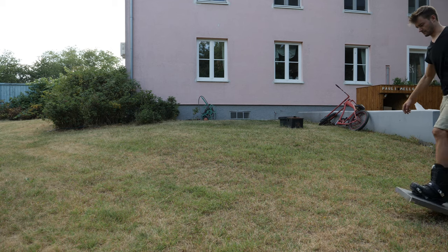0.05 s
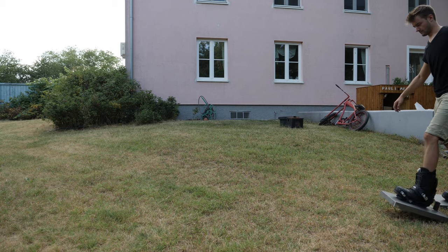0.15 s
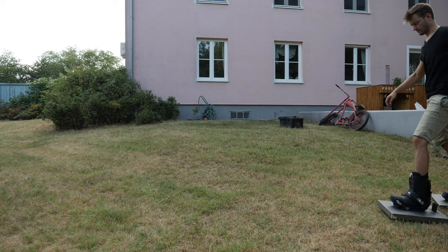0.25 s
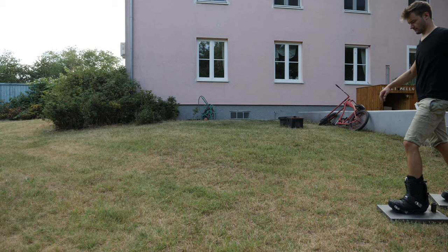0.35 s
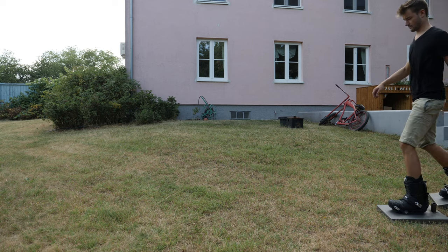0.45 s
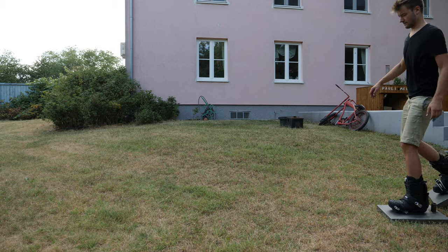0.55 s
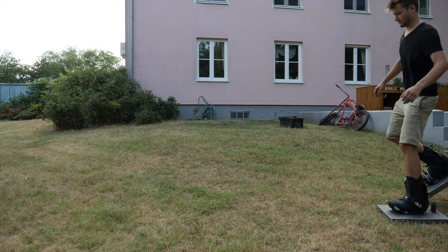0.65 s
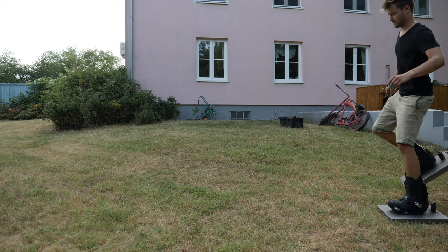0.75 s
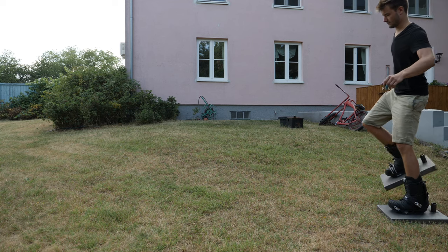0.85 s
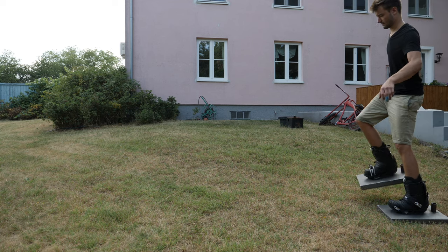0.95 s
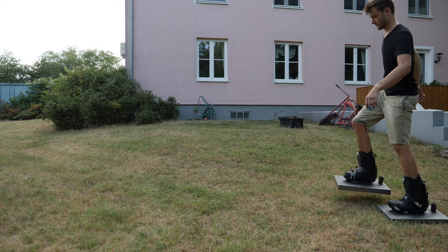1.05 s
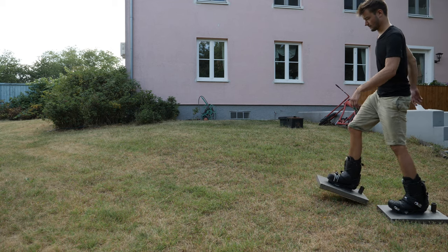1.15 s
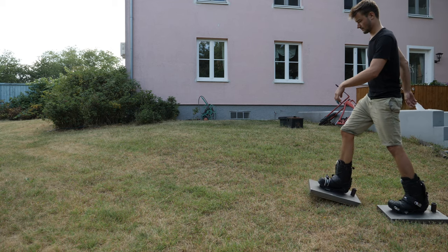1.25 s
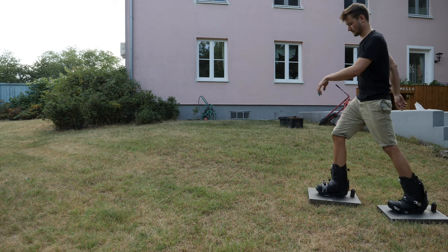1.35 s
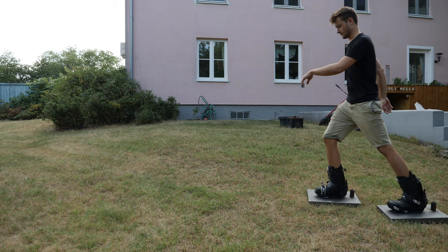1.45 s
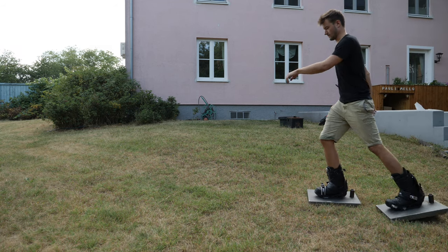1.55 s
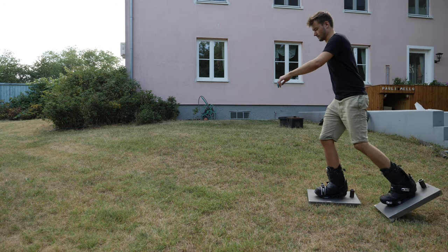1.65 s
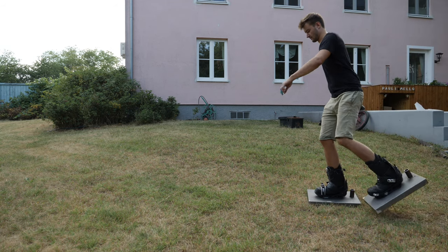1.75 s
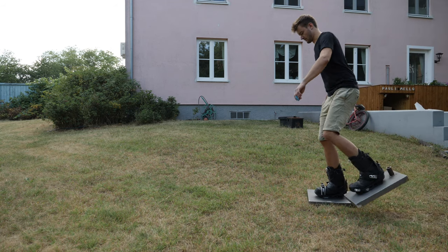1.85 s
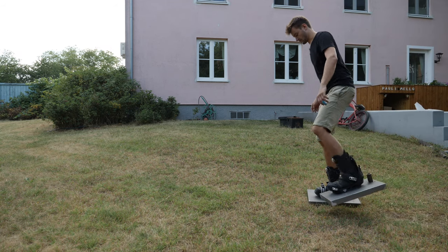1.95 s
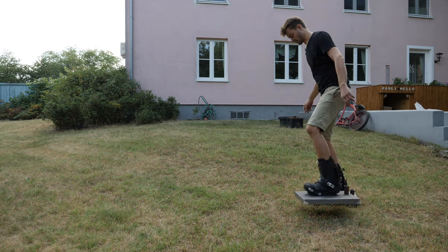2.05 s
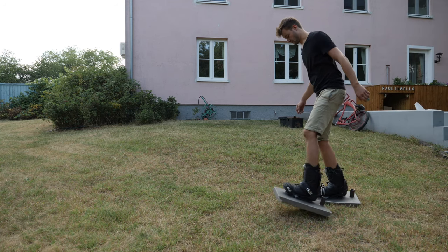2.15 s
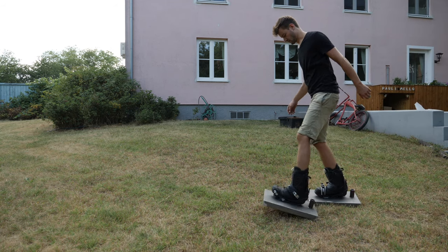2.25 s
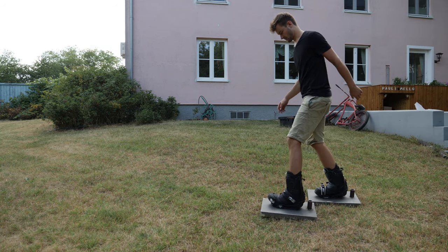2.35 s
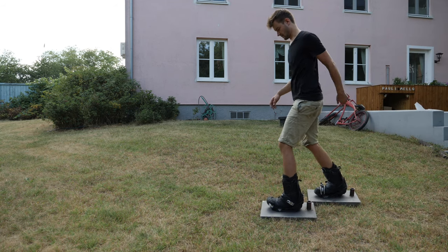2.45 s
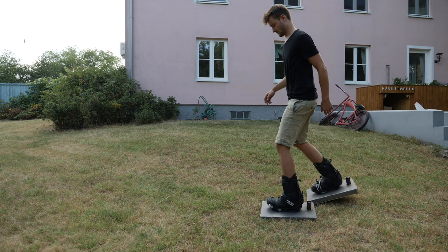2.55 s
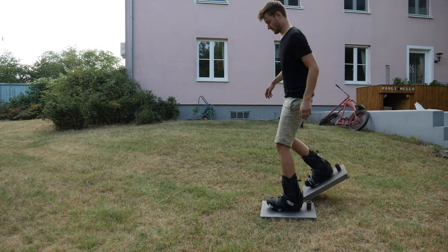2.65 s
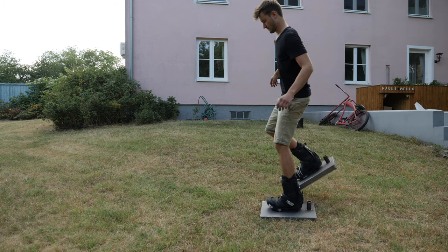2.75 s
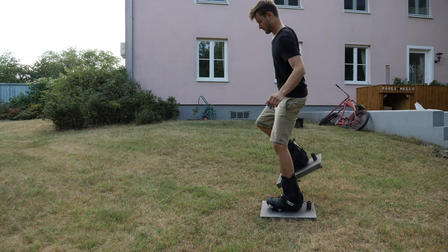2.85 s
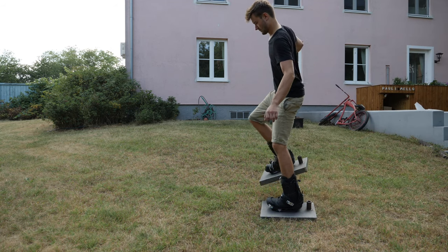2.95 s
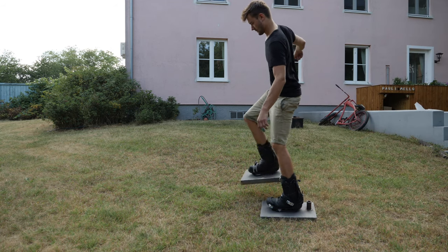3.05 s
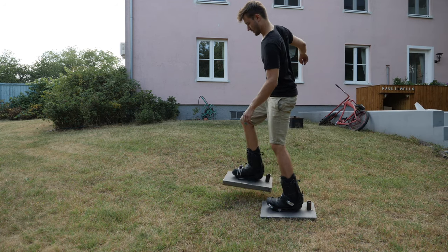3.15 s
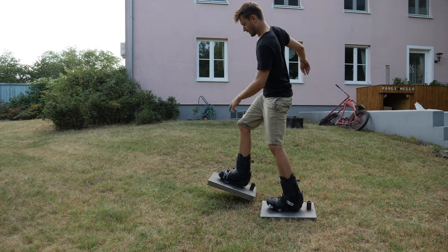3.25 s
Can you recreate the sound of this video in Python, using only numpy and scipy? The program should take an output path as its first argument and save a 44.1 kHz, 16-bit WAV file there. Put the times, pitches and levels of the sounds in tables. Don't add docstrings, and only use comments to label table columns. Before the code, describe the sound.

Plated boots walk on a dry lawn: hollow knocks, grass crackle, shell creaks, buckle ticks, wind rumble.

```python
import sys
import numpy as np
from scipy import signal
from scipy.fft import rfft, irfft
from scipy.io import wavfile
from scipy.ndimage import uniform_filter1d

SR = 44100
rng = np.random.default_rng(int(sys.argv[2]) if len(sys.argv) > 2 else 0)


def makeup_ratio(level_db):
    decades = np.asarray(level_db, float) / 20
    return 10 ** decades


def master(y):
    cut = np.clip(np.atleast_2d(y).T, -1, 1)
    pcm = np.round(cut * 32767)
    wavfile.write(sys.argv[1], SR, pcm.astype(np.int16))


N = 145530

# [t/s, level/dB]
GUSTS = [(0, -40.5), (.25, -38.5), (.5, -38.5), (.84, -30.5), (1.1, -35), (1.36, -38), (1.44, -26),
         (1.52, -36), (1.6, -20), (1.69, -21.5), (1.79, -38.5), (1.89, -26), (1.96, -33), (2.15, -20),
         (2.3, -31.5), (2.8, -29.5), (3.0, -22), (3.1, -40)]
# [f/Hz, level/dB per Hz]
AIR_COLOUR = [(90, -11.5), (210, -4.5), (300, -9.5), (3400, -28), (9000, -30), (11500, -21.5),
              (16000, -27.5)]
# [peak t/s, rise t/s, fall t/s, blades level/dB, scuff level/dB]
GRASS_CRUSHES = [(.0, .01, 0.02, -85, -64), (0.219, 0.057, 0.088, -36.5, -47),
                 (0.377, 0.14, 0.042, -45, -50), (0.413, 0.032, 0.023, -37.5, -44),
                 (0.487, 0.42, 0.12, -50, -46.5), (.63, 0.1, 0.1, -56, -47.5),
                 (0.757, 0.22, 0.15, -58, -51.5), (.97, 0.03, 0.17, -63, -53.5),
                 (1.297, 0.1, 0.14, -45, -44), (1.42, 0.14, 0.15, -57.5, -55),
                 (1.47, 0.017, 0.038, -42, -53), (1.494, 0.038, 0.022, -39, -42.5),
                 (1.547, 0.28, 0.14, -50.5, -47.5), (1.767, 0.19, 0.08, -49, -47),
                 (2.235, .01, 0.057, -70, -61.5), (2.179, 0.011, 0.068, -76, -56),
                 (2.302, 0.053, 0.11, -37.5, -54.5), (2.449, 0.024, 0.012, -44.5, -47.5),
                 (2.507, 0.17, 0.034, -40.5, -43.5), (2.559, 0.073, 0.079, -43, -45.5),
                 (2.739, 0.53, 0.14, -54, -49), (2.898, 0.12, 0.042, -61, -49.5),
                 (2.951, 0.016, 0.041, -61.5, -56.5), (3.3, 0.0078, .02, -75, -49)]
# [f/Hz, level/dB per Hz]
BLADE_COLOUR = [(900, -35), (1900, -6), (4000, -9.5), (8500, -9), (13000, -5.5), (15800, -9.5)]
# [f/Hz, level/dB per Hz]
SCUFF_COLOUR = [(120, -7), (250, -8), (500, 0.5), (1800, -9.5), (7000, -27)]
# [t/s, peak level/dB, f/Hz]
BUCKLE_TICKS = [(0.05, -46.5, 1470), (.119, -49, 1250), (0.161, -56, 3000), (.620, -25, 1850),
                (1.366, -33, 1500), (1.54, -35, 3170), (1.660, -38, 1350), (1.713, -25.5, 2260),
                (1.924, -50.5, 4300), (2.006, -50, 4100), (2.065, -59, 9100), (2.094, -51.5, 1930),
                (2.128, -41.5, 1220), (2.143, -55, 2490), (2.170, -34.5, 1190), (2.170, -43.5, 8300),
                (1.935, -44, 1130), (2.203, -55, 1500), (2.233, -57, 5700), (2.165, -55, 1500),
                (.334, -44, 4800), (2.683, -32.5, 3920), (2.506, -40, 4400), (2.684, -25, 1540),
                (3.139, -58, 6230)]
# [t/s, level/dB, rattle length t/s, brightness level/dB per octave]
PLATE_LANDINGS = [
    (0.218, -32, 0.0044, -2),
    (.226, -21.5, 0.011, 2),
    (1.297, -31, 0.0091, -4),
    (2.304, -24.5, 0.029, -2),
    (2.31, -22.5, 0.012, 1.5),
]
# [f/Hz, level/dB, time to fall 60 dB t/s]
PLATE_MODES = [(435, -10.5, 0.31), (591.6, -2.5, 0.17), (653.4, -8, 0.2), (811.7, 0, 0.19),
               (1133.4, 5.5, 0.082), (1273, 1, 0.092), (1536, -1.5, 0.14), (1753, -8, 0.21),
               (1987, -11.5, 0.13), (2103, -9.5, 0.12), (2490, -8.5, 0.17), (2835, -15, 0.14),
               (3544, -12, 0.15), (4360, -3, 0.072)]
# [t/s, level/dB, f/Hz]
WEIGHT_THUDS = [
    (.417, -22, 122),
    (.5, -39.5, 93),
    (1.8, -39, 227),
    (1.2, -28, 89),
    (1.185, -45, 180),
    (3.7, -39, 69),
    (2.508, -31.5, 71),
]
# [t/s, peak level/dB]
LONE_SLIPS = [(.512, -38), (.536, -35), (.552, -35), (.595, -40), (.605, -43), (.613, -36), (.790, -45),
              (.807, -48), (.851, -43), (1.007, -43), (1.026, -41), (1.035, -41), (1.057, -43),
              (1.070, -52), (1.088, -43), (1.110, -50), (1.117, -44), (1.102, -54), (1.146, -44),
              (1.151, -51), (1.160, -48), (1.170, -41), (1.183, -49), (1.192, -41), (1.204, -48),
              (1.212, -40), (1.221, -47), (1.227, -42), (1.235, -47), (1.240, -42), (1.250, -41),
              (.632, -41), (.640, -39), (.649, -41), (.660, -41), (.675, -40), (.688, -38), (.698, -38),
              (.708, -39), (.717, -39), (2.695, -40), (2.703, -40), (2.804, -38), (2.811, -37),
              (2.819, -38), (2.829, -38), (2.841, -39), (2.852, -38), (2.861, -39), (1.549, -37),
              (1.563, -40), (1.684, -43), (1.703, -43), (2.671, -39), (3.155, -38), (3.174, -39)]
# [t/s, slip rate f/Hz, level/dB]
CREAK_RUNS = [
    [(.435, 115, -36), (.462, 125, -36), (.475, 240, -38), (.495, 230, -37), (.504, 120, -37)],
    [(.724, 165, -39), (.745, 215, -40), (.76, 210, -41), (.771, 140, -41), (.78, 110, -41)],
    [(.818, 170, -47), (.843, 190, -48)],
    [(.928, 120, -41), (.96, 105, -44), (.972, 170, -43), (.996, 100, -41)],
    [(1.259, 120, -43), (1.285, 110, -42)],
    [(1.514, 160, -40), (1.53, 130, -40)],
    [(1.723, 200, -44), (1.776, 230, -43)],
    [(2.533, 140, -37), (2.56, 150, -37), (2.585, 150, -40), (2.6, 105, -39), (2.636, 110, -40)],
    [(2.709, 175, -38), (2.735, 195, -37), (2.76, 160, -36), (2.799, 150, -37)],
    [(2.867, 180, -41), (2.88, 320, -44), (2.908, 300, -46)],
]
# [f/Hz, level/dB]
BENT_SHELLS = [
    [(3300, -12), (5000, -22), (9000, -34)],
    [(2270, -11.5), (6100, -17), (9400, -16.5)],
    [(2400, -10), (4200, -20), (9200, -15)],
    [(2000, -15.5), (3500, -14.5), (8400, -7)],
    [(1900, -8.5), (3400, -14), (8600, -7)],
    [(3230, -17), (5000, -23), (9000, -22)],
    [(2400, -11.5), (5000, -30), (9000, -20)],
    [(3100, -11.5), (5500, -12), (9000, -14)],
    [(1850, -11.5), (4600, -18.5), (9100, -18)],
    [(2000, -13.5), (3600, -16), (7100, -13.5)],
]
# [f/Hz, level/dB per Hz]
SHELL_COLOUR = [(150, -2.5), (500, 4.5), (1200, -10.5), (3000, -1), (6000, -8), (9000, -7), (16000, -7.5)]


def rms_one(x):
    return x / np.sqrt(np.mean(x ** 2) + 1e-20)


def colour(x, points):
    hz, db = np.transpose(points)
    f = np.maximum(np.fft.rfftfreq(len(x), 1 / SR), 1)
    gain = makeup_ratio(np.interp(np.log(f), np.log(hz), db, left=-80))
    return rms_one(irfft(rfft(x) * gain, len(x)))


def ring(x, hz, t60):
    r = makeup_ratio(-60 / (t60 * SR))
    w = 2 * np.pi * hz / SR
    return signal.lfilter([0, np.sin(w)], [1, -2 * r * np.cos(w), r * r], x + 1e-18)


def clicks(s, gain):
    return np.bincount(np.clip((np.asarray(s) * SR).astype(int), 0, N - 1), gain, N)


def cut(x, hz, kind, order=2):
    return signal.sosfilt(signal.butter(order, hz, kind, fs=SR, output="sos"), x)


def grains(per_s):
    spread_db = 2.5
    happens = rng.random(N) < per_s / SR
    size = makeup_ratio(spread_db * np.minimum(rng.exponential(1, N), 5))
    return happens * size * rng.choice([-1, 1], N)


def garden_air():
    return makeup_ratio(-65) * colour(rng.standard_normal(N), AIR_COLOUR)


def wind():
    white = rng.standard_normal((2, N + SR))
    deep = cut(cut(white[0], 21.35, "low", order=4), 5.3, "high")
    skirt = cut(white[1], 69, "low")
    deep = rms_one(deep[SR:])
    deep = deep / np.sqrt(uniform_filter1d(deep ** 2, size=3000) + 0.017)
    s, db = np.transpose(GUSTS)
    gust = makeup_ratio(np.interp(np.arange(N) / SR, s, db))
    return gust * (deep + makeup_ratio(-37.5) * rms_one(skirt[SR:]))


def grass():
    t = np.arange(N) / SR
    blades_power, scuff_power = 0, 0
    for s, rise, fall, blades_db, scuff_db in GRASS_CRUSHES:
        shape = makeup_ratio(-20 * np.where(t < s, (s - t) / rise, (t - s) / fall))
        shape = shape * np.clip((t - s + rise) / .006 + 1, 0, 1)
        blades_power = blades_power + (makeup_ratio(blades_db) * shape) ** 2
        scuff_power = scuff_power + (makeup_ratio(scuff_db) * shape) ** 2
    blades = np.sqrt(blades_power) * colour(grains(per_s=9000), BLADE_COLOUR)
    scuff = np.sqrt(scuff_power) * colour(grains(per_s=2500), SCUFF_COLOUR)
    return blades + scuff


def ticks():
    ring_cycles, scratch_db, scratch_t60_s, snap_db = 16, 3, .016, -15.5
    t = np.arange(N) / SR
    out = np.zeros(N)
    for s, db, hz in BUCKLE_TICKS:
        fade = makeup_ratio(db + scratch_db - 60 * np.maximum(t - s, 0) / scratch_t60_s)
        scratch = rng.standard_normal(N) * (t >= s) * fade
        out += cut(cut(scratch, hz / 1.6, "high"), min(1.5 * hz, 20000), "low")
        out += makeup_ratio(snap_db) * cut(scratch, hz, "high")
        knocks = clicks([s, s + .003], makeup_ratio([db - 6, db - 8]))
        out += ring(knocks, hz, ring_cycles / hz)
    return out


def plates():
    modes_db, crack_db, boom_db = -11, 1.5, -6.5
    crack_t60_s, boom_t60_s = 0.058, 0.15
    t = np.arange(N) / SR
    out = np.zeros(N)
    for s, db, rattle_s, tilt_db in PLATE_LANDINGS:
        since = np.maximum(t - s, 0)
        white = (t >= s) * rng.standard_normal((3, N))
        hit = clicks([s], [1]) + 0.054 * white[0] * np.exp(-since / rattle_s)
        for hz, mode_db, t60 in PLATE_MODES:
            chance_db = rng.standard_normal()
            bright_db = tilt_db * np.log2(hz / 1000)
            out += makeup_ratio(db + modes_db + mode_db + chance_db + bright_db) * ring(hit, hz, t60)
        crack = cut(cut(white[1], 4250, "low", order=1), 350, "high")
        out += makeup_ratio(db + crack_db + 2 * tilt_db - 60 * since / crack_t60_s) * crack
        boom = 4 * cut(cut(white[2], 2050, "low"), 202, "high")
        out += makeup_ratio(db + boom_db - 60 * since / boom_t60_s) * boom
    return out


def thuds():
    out = np.zeros(N)
    for s, db, hz in WEIGHT_THUDS:
        swing = ring(clicks([s], [makeup_ratio(db)]), hz, 0.038)
        out += cut(swing, 10 * hz, "low")
    return out


def creaks():
    slip_db, slip_t60_s = 8, .009
    timing_jitter, level_spread_db = .03, 1.0
    shared_echo, own_echo = .14 * 0 + .1, .14
    bend_cycles, bend_wander, bend_spread_db = 16, .05, 3
    lone_s, lone_db = np.transpose(LONE_SLIPS)
    distance = [np.minimum(abs(lone_s - run[0][0]), abs(lone_s - run[-1][0])) for run in CREAK_RUNS]
    nearest = np.argmin(distance, axis=0)
    lag = np.arange(768)
    fade = makeup_ratio(-60 * lag / SR / slip_t60_s)
    sharp, bent = np.zeros(N), np.zeros(N)
    for k, (run, bends) in enumerate(zip(CREAK_RUNS, BENT_SHELLS)):
        s, rate, db = np.transpose(run)
        t = np.arange(s[0], s[-1], 1 / SR)
        turns = np.cumsum(np.interp(t, s, rate)) / SR
        count = int(turns[-1]) + 1
        at = np.interp(np.arange(count) + timing_jitter * rng.standard_normal(count), turns, t)
        run_db = np.interp(at, s, db) + level_spread_db * rng.standard_normal(count)
        level = np.r_[run_db, lone_db[nearest == k]][:, None]
        start = (np.r_[at, lone_s[nearest == k]] * SR).astype(int)
        where = (start[:, None] + lag).ravel()
        n = len(level)
        echoes = shared_echo * rng.standard_normal(len(lag)) + own_echo * rng.standard_normal((n, len(lag)))
        slips = makeup_ratio(level) * ((lag == 0) + fade * echoes)
        sharp += np.bincount(where, slips.ravel(), N)
        for hz, bend_db in bends:
            cycles = lag / SR * hz * (1 + bend_wander * rng.standard_normal((n, 1)))
            ring_db = level + bend_db + bend_spread_db * rng.standard_normal((n, 1))
            rings = makeup_ratio(ring_db - 60 * cycles / bend_cycles) * np.sin(2 * np.pi * cycles)
            bent += np.bincount(where, rings.ravel(), N)
    return makeup_ratio(slip_db) * (colour(sharp, SHELL_COLOUR) * np.std(sharp) + bent)


def scene():
    return (garden_air() + wind() + grass() + ticks() + plates() + thuds() + creaks())[None]


def roll_off(x):
    return signal.sosfilt(signal.butter(12, 16470, fs=SR, output="sos"), x)


def record(dry):
    shelf_hz, shelf_db, top_hz = 9870, -10.5, 15700
    hz = np.fft.rfftfreq(N, 1 / SR)
    shelf = shelf_db * np.clip((hz - shelf_hz) / 900 + .5, 0, 1)
    top = -60 * np.clip((hz - top_hz) / 400, 0, 1)
    mix = irfft(rfft(dry) * makeup_ratio(shelf + top), N)
    return roll_off(mix)


dry = scene()
out = record(dry)
master(out)
```